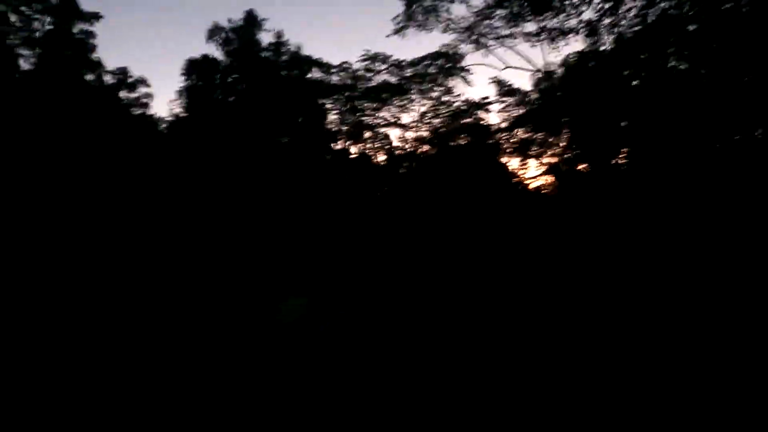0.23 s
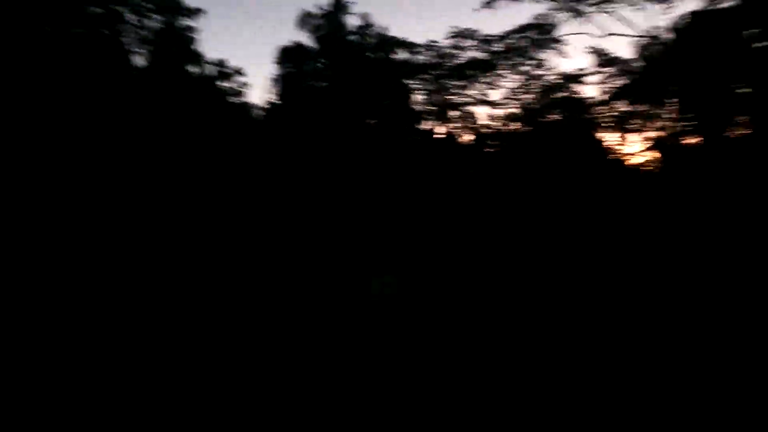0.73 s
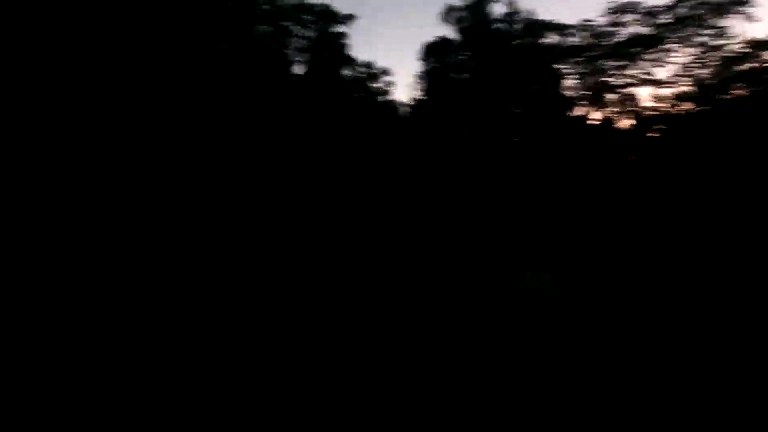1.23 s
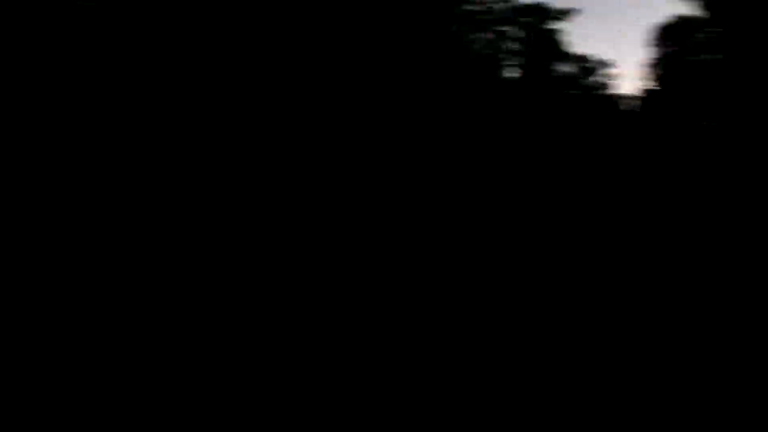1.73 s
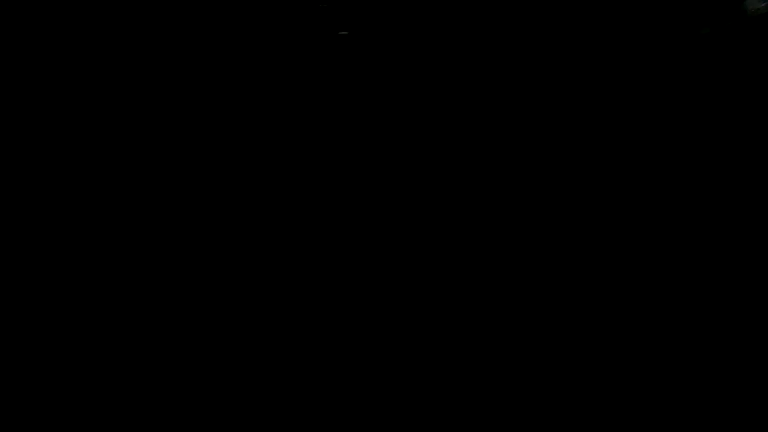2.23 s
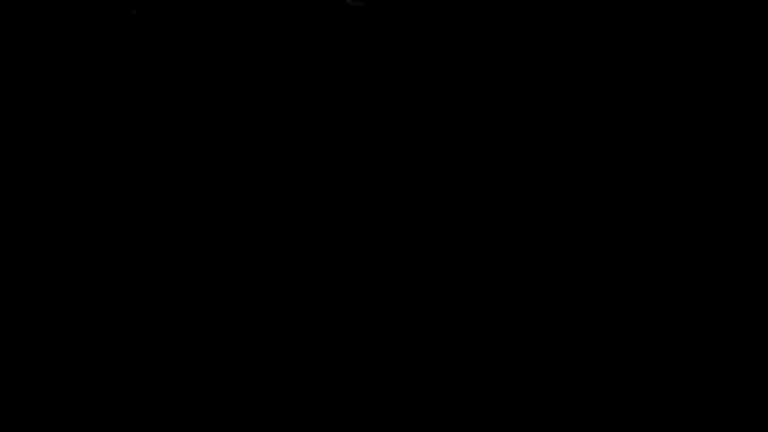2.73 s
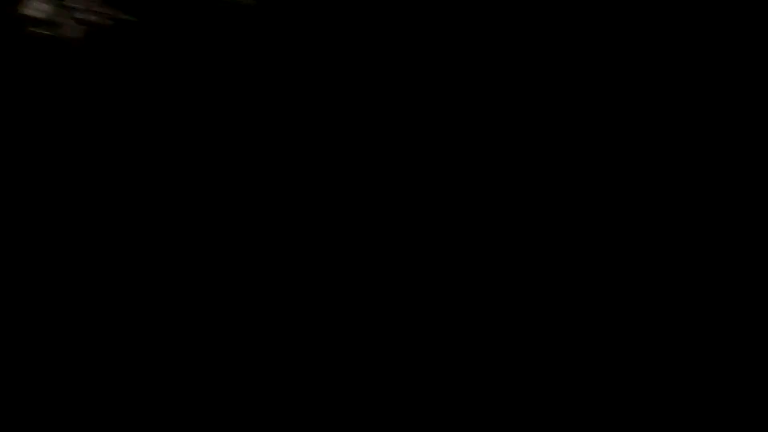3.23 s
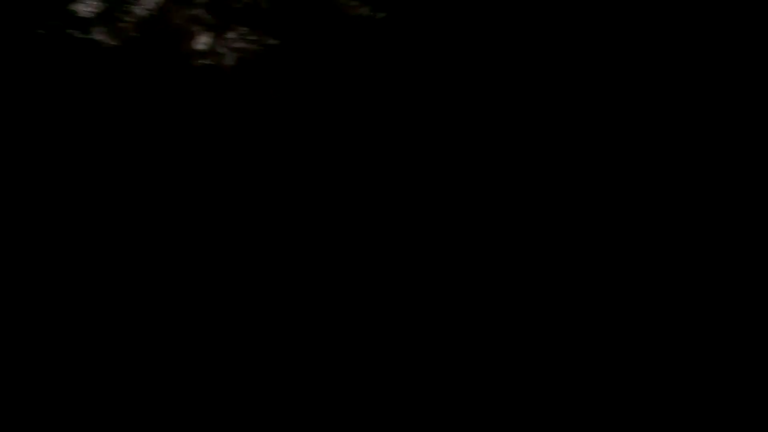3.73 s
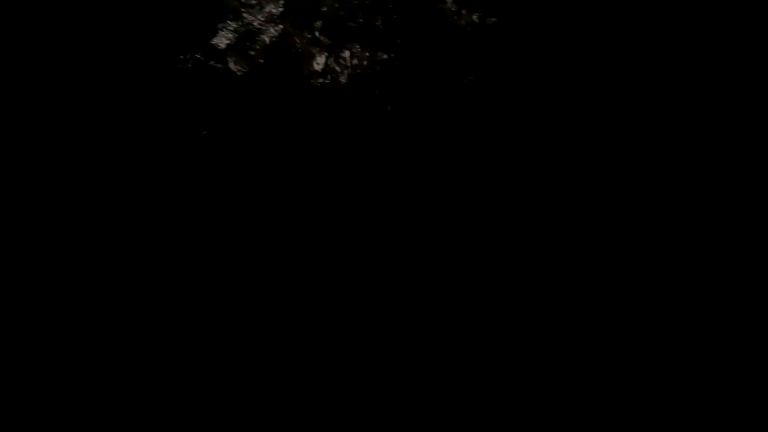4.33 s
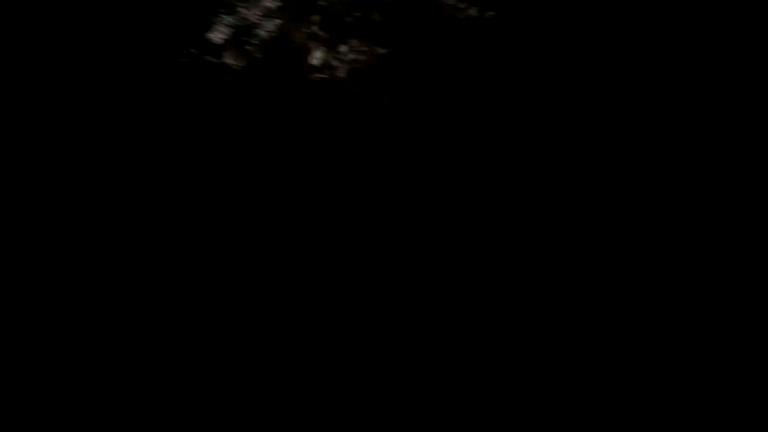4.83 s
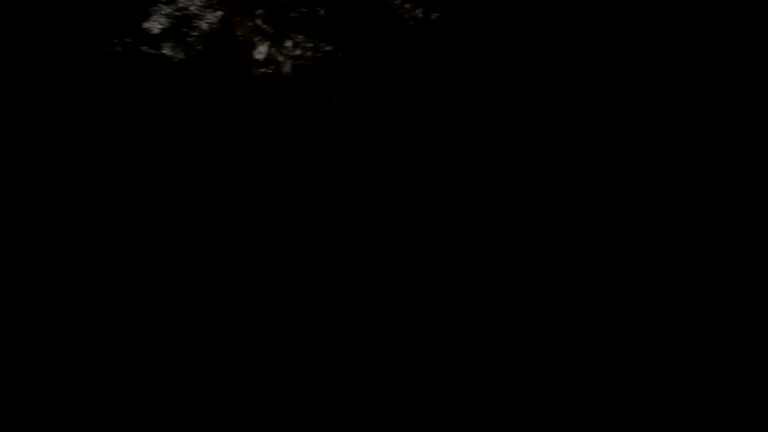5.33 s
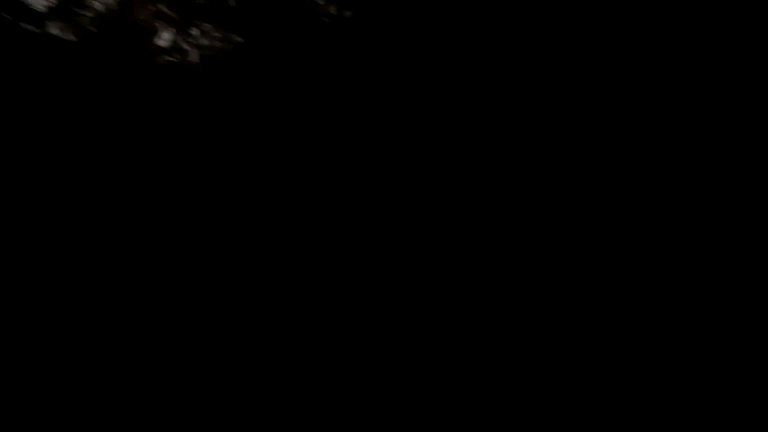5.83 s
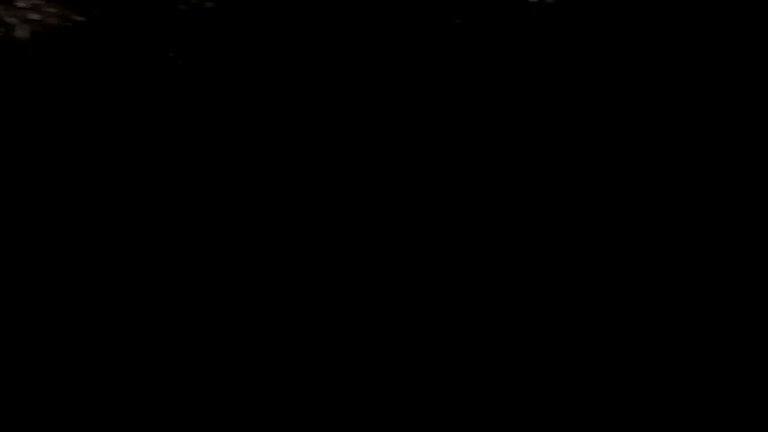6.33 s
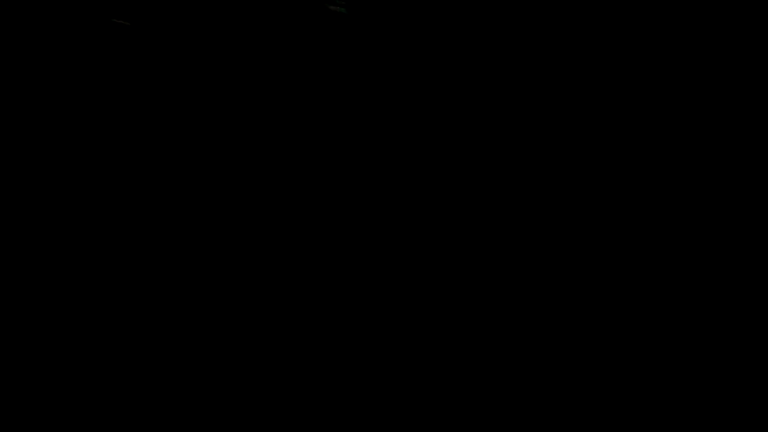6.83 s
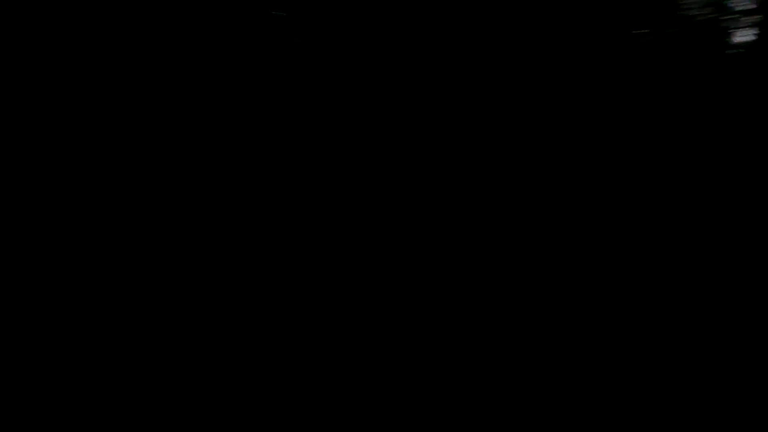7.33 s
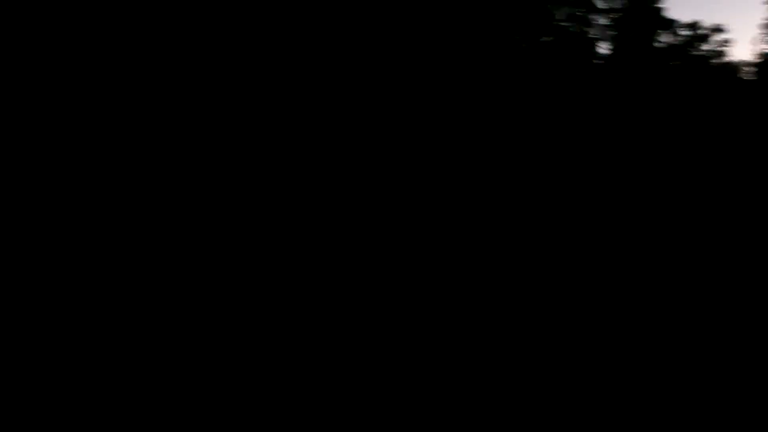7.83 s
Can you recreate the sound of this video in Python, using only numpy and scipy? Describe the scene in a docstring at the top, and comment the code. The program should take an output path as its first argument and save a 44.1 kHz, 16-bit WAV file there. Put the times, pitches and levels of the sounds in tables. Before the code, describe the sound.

Hand-held camera outdoors among trees at daybreak. Countless small birds chirp and whistle near and far, with diffuse woodland reverberation. Fingers tap, creak and scuff the plastic body very close, sharp clicks first clustering about two seconds in. A regular falling coo then joins, with two faint hoarse calls, crackling rustles and a mellow whistle rising in steps; late clicks and bumps return. The sound opens from central to wide.

```python
"""Dawn in a forest, heard by a hand-held camera: from the start many birds whistle, chirp and glide as sines with
noise-shaped echoes among the trees, over far song and a low murmur of air. The image begins central and opens by
3.6 s. Fingers click most densely from 1.9 to 3 s, with decaying rings, creaks, thumps and filtered-noise rubs.
Coos follow from 3 s, a hoarse call near 3.4 and 6.3 s, strong puffs of crackling rustle between 3.9 and 4.8 s,
and a whistle climbing in steps near 5.8 and 6.6 s; after 6.4 s the clicks gather again."""
import sys
import numpy as np
from scipy import signal
from scipy.fft import rfft, irfft, next_fast_len
from scipy.io import wavfile
from scipy.ndimage import uniform_filter1d, map_coordinates

SR = 44100
rng = np.random.default_rng(int(sys.argv[2]) if len(sys.argv) > 2 else 0)


def to_wav(sig):
    """Store sig (one row per channel, or 1-D mono) as 16-bit WAV at the path in sys.argv[1].

    Samples outside -1..1 are clipped; the rate is SR.
    """
    pcm = np.clip(np.atleast_2d(sig), -1, 1) * 32767
    pcm = np.round(pcm).astype(np.int16)
    wavfile.write(sys.argv[1], SR, pcm.T)  # frames by channels


N = 356945

# Levels in the tables are relative: layer gains and stereo balance follow.
# Steady low murmur of the air: (frequency [Hz], density [dB per Hz])
AIR_SPECTRUM = [(90, -64), (125, -7), (170, 5), (300, -10), (700, -9), (1000, -43.5)]
# Far song as a whole: (time [s], relative level [dB])
FAR_LEVEL = [(0.0, -43.5), (0.31, -45), (8.09, -44)]
# Blur of birds too far to tell apart: (frequency [Hz], density [dB per Hz])
BLUR_SPECTRUM = [(500, -35), (850, -16.5), (1150, -3), (2000, -4.5), (2600, 1.5), (3600, 5.5), (5600, -7.5),
                 (7500, -28), (10000, -88)]
# Dry leaves or cloth rustling close by: (frequency [Hz], density [dB per Hz])
RUSTLE_SPECTRUM = [(3240, -14), (5500, -39.5), (5830, -7.5), (7290, -11), (9960, -22.5), (11400, -30.5),
                   (16000, -61)]
# Its slow level: (time [s], relative level [dB])
RUSTLE_LEVEL = [(0.0, -76), (1.1, -77.5), (2.54, -66.5), (3.51, -74), (4.69, -72), (5.25, -75.5),
                (6.74, -68), (7.23, -72.5), (8.09, -56)]
# Its puffs: (time [s], relative level at the height [dB])
RUSTLE_PUFFS = [(1.33, -76), (1.52, -75), (2.45, -68), (2.95, -81), (3.96, -58), (4.18, -75), (4.27, -68),
                (4.39, -67), (4.58, -69), (4.73, -56.5), (4.97, -71), (5.18, -72), (5.47, -63.5),
                (5.57, -67), (5.77, -69), (6.13, -73), (6.28, -78), (6.68, -66), (6.9, -65), (7.26, -61.5),
                (7.46, -65), (7.89, -64)]
PUFF_RISE_S, PUFF_FALL_S = 0.027, 0.039  # time constants

# Sway of a steady hand: (frequency [Hz], density [dB per Hz])
SWAY_SPECTRUM = [(12, 1.5), (30, -9.5), (60, -7.5), (110, -44), (200, -85)]
STILL_DB = -70.5  # its relative level
# Jolts of the grip, each a low swing: (time [s], relative level at the height [dB])
GRIP_JOLTS = [(.3, -49), (.45, -50), (.96, -56), (1.79, -45), (2.05, -49), (2.5, -49), (2.72, -32.5),
              (2.9, -58), (3.3, -50.5), (3.45, -54), (3.65, -37), (3.71, -47), (3.87, -48.5), (4.05, -51),
              (4.23, -48), (4.29, -44), (4.34, -49), (4.38, -49), (4.45, -46), (4.62, -40.5), (4.68, -51),
              (5.17, -52.5), (5.84, -40.5), (6.65, -56), (7.23, -51), (7.35, -55), (7.48, -55),
              (7.71, -33.5), (7.78, -36)]
JOLT_HZ, JOLT_DRIFT = 27, .2  # pitch of the swing, its drift as a share
JOLT_RISE_S, JOLT_FALL_S = 0.012, 0.022  # time constants
# Skin on plastic: (frequency [Hz], density [dB per Hz])
RUB_SPECTRUM = [(53, -50.5), (90, -14), (259, -2), (789, -11.5), (888, -12.5), (1210, -6), (1800, -12.5),
                (3000, -13.5), (3900, -41), (6600, -120)]
# Skin creeping on the shell: (time [s], relative level [dB])
RUB_LEVEL = [(0.0, -61.5), (0.45, -57.5), (1.78, -59), (1.91, -49), (2.34, -58.5), (2.88, -81),
             (3.22, -60.5), (3.47, -56.5), (4.1, -62.5), (4.4, -46), (4.93, -63.5), (7.64, -68.5),
             (7.8, -52.5), (8.09, -47.5)]
# Short scuffs of a finger: (time [s], relative level at the height [dB])
FINGER_SCUFFS = [(.01, -52.5), (.42, -52.5), (1.42, -53), (1.76, -77), (2.1, -56), (2.46, -43.5),
                 (2.72, -52), (3.4, -57), (3.7, -57), (3.87, -52), (4.27, -47), (4.34, -56), (4.44, -70),
                 (4.73, -59), (4.65, -63), (5.42, -60), (6.65, -57), (7.26, -60), (7.75, -50), (7.92, -77)]
SCUFF_RISE_S, SCUFF_FALL_S = 0.065, 0.045  # time constants
# Gain of the rub's treble: (time [s], gain [dB])
RUB_TREBLE_GAIN = [(0, 0), (2.6, 1.5), (3.4, -5), (4.2, -14), (5.3, -12), (7.0, 0.5), (7.8, -6), (8.09, -6)]
RUB_SPLIT_HZ = 720
# Thumps of the grip: (time [s], relative level [dB], push length [s])
GRIP_THUMPS = [(2.707, -25.5, 0.0013), (3.651, -37.5, 0.0045), (4.255, -35.5, 0.0011), (4.33, -36, 0.0018),
               (4.416, -34, 0.0011), (4.47, -46, 0.00083), (7.781, -30.5, 0.0032), (5.826, -20.5, 0.00081),
               (6.619, -44, 0.0013), (7.891, -23.5, 0.00073)]
# Creaks of the shell: (time [s], length [s], slips [per s], ring [Hz], relative level [dB])
SHELL_CREAKS = [(0.01, .03, 72, 260, -25), (1.695, 0.067, 75, 347, -32), (2.423, .012, 60, 278, -24.5),
                (7.12, .012, 60, 196, -32.5), (7.238, .012, 60, 410, -30), (7.255, .012, 60, 267, -28.5)]
# Clicks of the shell: (time [s], relative level [dB], ring [Hz], relative level of the bright tick [dB])
SHELL_CLICKS = [(0.441, -24, 1320, -82), (0.6, -32, 1220, -76), (1.89, -27, 1800, -57),
                (1.918, -33, 596, -74), (1.936, -12.5, 910, -68), (1.9365, -9.5, 3370, -76),
                (2.049, -32, 1320, -58), (2.18, -30.5, 1210, -67), (2.194, -25, 1300, -64),
                (2.387, -12.5, 1480, -72), (2.446, -31.5, 566, -46), (2.463, -34, 1510, -50),
                (2.481, -33, 1920, -80), (2.514, -26, 2180, -57), (2.555, -12.5, 5070, -70),
                (2.555, -31, 1130, -39.5), (2.634, -27.5, 1030, -68), (2.733, -28.5, 1090, -56),
                (2.743, -20, 1150, -67), (2.961, -31.5, 1420, -53), (2.99, -30, 1370, -60),
                (3.345, -28, 1250, -57), (3.383, -33, 1320, -76), (3.931, -62, 1130, -42),
                (4.263, -38, 784, -45.5), (4.377, -30, 1140, -47.5), (5.824, -38, 664, -48),
                (6.277, -35, 1680, -46), (6.446, -21, 2100, -41.5), (6.664, -28, 1650, -50),
                (6.907, -37, 2130, -44.5), (7.256, -16.5, 1170, -66), (7.257, -15.5, 2330, -67),
                (7.427, -20.5, 1340, -39.5), (7.465, -26, 1360, -49), (7.475, -31.5, 1380, -74),
                (7.669, -23, 2200, -71), (7.718, -29.5, 1780, -71), (7.762, -24, 1400, -62),
                (7.847, -26.5, 1440, -43), (7.888, -35, 680, -56)]
# The shell's high modes: (frequency [Hz], width [Hz], gain [dB])
SHELL_MODES = [(5100, 280, 7), (7100, 2700, 20), (11100, 6500, -32)]

# Echoes among the trees: (frequency [Hz], time to fall 60 dB [s])
TREE_T60 = [(800, 1.0), (2200, 1.3), (4000, 1.0), (7000, .7)]
STIR_S, STIR_PER_S = .00022, 26  # moving leaves shift the echoes in time; knots of that shift a second
LEAVES_DB, LEAVES_T60_S = 4, 0.19  # scatter off the nearest branches against direct sound
SCATTER_HZ, ECHO_TILT_DB = 3200, 4  # leaves scatter little below this pitch; dB more echo an octave up
NEAR_DB, DRIER = -58.5, 0.13  # a bird louder than this is nearer: dB less echo for each dB of level
# Echo against direct sound before distance and pitch: (kind of note: gain [dB])
KIND_ECHO_DB = {"glide": 0, "plunge": -9, "chip": -5, "held": -2, "coo": -1.5, "crow": 2, "climb": 3.5}

# Flutter of a note at FLUTTER_HZ, growing with the square of its pitch: level [dB], phase [rad]
FLUTTER_DB, FLUTTER_RAD, FLUTTER_HZ = 2.5, 1, 4110
WARBLE, WARBLE_PER_S = .012, 35  # pitch drift as a share at FLUTTER_HZ; knots a second
# Attack and release as shares of a note; longest attack (a release may take twice that)
ATTACK, RELEASE, EDGE_S = .25, .25, .016

# Slurred whistles, rising or falling: (time [s], length [s], start [Hz], end [Hz], relative level [dB])
GLIDE_NOTES = [(6.948, 0.039, 3320, 2050, -58), (7.679, 0.036, 5250, 3900, -40.5),
               (6.411, 0.019, 6170, 4950, -53), (6.553, 0.031, 2960, 2180, -46.5),
               (0.187, 0.043, 5810, 4660, -51), (0.705, 0.083, 3750, 2540, -51),
               (7.146, 0.023, 2080, 3130, -48.5), (0.317, 0.067, 3590, 3920, -44.5),
               (0.377, 0.025, 4190, 4500, -44), (0.4, 0.034, 4560, 4330, -42.5),
               (.44, 0.043, 4370, 4510, -59), (0.415, 0.048, 3700, 3540, -46),
               (0.62, 0.1, 5060, 3840, -43.5), (0.882, 0.057, 3040, 3265, -44),
               (0.951, 0.1, 6130, 4700, -51.5), (0.984, 0.13, 3980, 4116, -42.5),
               (1.202, 0.046, 4200, 4840, -42.5), (1.3, 0.047, 3180, 2880, -45.5),
               (0.984, 0.029, 3110, 2770, -44.5), (1.12, 0.033, 4130, 3630, -39),
               (1.343, 0.098, 2900, 4276, -44), (1.603, 0.04, 6260, 4700, -50.5),
               (1.625, 0.067, 4670, 3980, -42), (1.864, 0.019, 6450, 3706, -45),
               (2.128, 0.086, 4040, 3590, -47), (2.38, 0.076, 4220, 3640, -51.5),
               (2.479, 0.046, 4650, 3500, -50), (2.893, 0.054, 3540, 4185, -43),
               (3.087, 0.039, 6460, 5400, -52), (3.252, 0.089, 4420, 4710, -55),
               (3.935, 0.07, 4240, 3224, -47), (3.833, 0.039, 2886, 2300, -49.5),
               (4.01, 0.045, 2690, 2395, -46.5), (4.309, 0.074, 3304, 4190, -43),
               (4.621, 0.058, 2383, 2584, -48), (7.367, 0.017, 2460, 3210, -47),
               (7.384, 0.02, 3210, 2450, -46.5), (7.17, 0.024, 3100, 2144, -49),
               (7.668, 0.02, 4430, 5350, -41), (7.915, 0.032, 4280, 5160, -42.5),
               (4.492, 0.029, 4860, 3400, -44.5), (5.664, 0.045, 4060, 3400, -49.5),
               (5.732, 0.04, 2516, 1470, -49.5), (5.888, 0.095, 2870, 3390, -51),
               (6.29, 0.14, 5320, 3210, -44), (6.429, 0.16, 3125, 4610, -50),
               (6.638, 0.054, 4820, 3880, -44.5), (6.716, 0.028, 4050, 3176, -40.5),
               (6.835, 0.077, 4780, 3155, -45), (6.865, 0.058, 5740, 4480, -45.5),
               (6.912, 0.065, 4500, 3700, -45), (6.964, 0.1, 3570, 4120, -44.5),
               (6.995, 0.025, 4370, 5950, -56), (7.199, 0.029, 2500, 3570, -42.5),
               (7.202, .025, 2540, 2520, -48), (7.422, 0.027, 2636, 2400, -53),
               (4.163, 0.041, 2700, 3380, -53), (7.207, 0.0263, 4950, 4250, -40),
               (7.234, 0.054, 4200, 4015, -39), (7.303, 0.057, 4090, 3530, -41.5),
               (7.459, 0.062, 4085, 3715, -41), (7.632, 0.028, 6400, 4220, -46),
               (7.655, 0.15, 3570, 2600, -53.5), (7.709, 0.065, 3830, 3794, -37),
               (7.753, 0.075, 3816, 4133, -40.5), (7.759, 0.037, 5380, 6130, -46),
               (7.944, 0.031, 5000, 3820, -41.5), (3.501, 0.056, 3000, 3557, -48.5),
               (3.534, .04, 3600, 3200, -57), (3.781, 0.04, 2754, 1860, -59),
               (4.221, 0.041, 3400, 2290, -47), (6.48, 0.016, 6020, 5250, -50),
               (0.931, 0.032, 2930, 2000, -48.5), (1.01, .04, 2724, 2060, -56),
               (7.902, .03, 3485, 2530, -53), (7.79, 0.027, 2800, 2050, -55),
               (7.985, .025, 3340, 2590, -47)]
HOOK = .68  # share of the slur done half-way through
# One bird plunging to the same low pitch: (time [s], top [Hz], relative level [dB])
PLUNGE_NOTES = [(.477, 3570, -51.5), (1.711, 3860, -46.5), (3.3, 4010, -48), (4.737, 3950, -43)]
PLUNGE_HZ_PER_S, PLUNGE_END_HZ = 22000, 2180
# Chips that flick up and down again: (time [s], top [Hz], flick [share of pitch], relative level [dB])
CHIP_NOTES = [(.001, 3350, 0.032, -48.5), (1.4, 4710, 0.062, -55), (1.497, 4200, 0.077, -50.5),
              (2.053, 3510, 0.09, -44.5), (2.764, 3460, 0.049, -47.5), (3.379, 5470, .06, -54),
              (4.188, 3460, 0.15, -40), (4.955, 3460, 0.109, -40.5), (7.375, 4920, 0.11, -47.5)]
CHIP_S = 0.0655
# Level whistles that sag a little: (time [s], length [s], pitch [Hz], relative level [dB])
HELD_NOTES = [(0.363, 0.011, 2560, -43.5), (0.875, 0.081, 4040, -45), (0.943, 0.03, 3700, -41.5),
              (4.717, 0.026, 4100, -43), (4.219, 0.11, 3960, -56), (4.511, 0.025, 3430, -43.5),
              (5.039, 0.022, 3427, -59), (7.81, 0.025, 3630, -43), (7.463, 0.034, 3990, -47),
              (6.897, 0.037, 3035, -44.5), (1.439, 0.1, 3733, -45.5), (1.691, 0.077, 3840, -42),
              (2.227, 0.055, 3930, -53), (3.289, 0.024, 4120, -44), (3.809, 0.03, 2930, -46.5),
              (4.04, 0.048, 3470, -49), (2.405, 0.043, 2513, -50), (2.592, 0.046, 2440, -54),
              (2.668, 0.1, 4000, -50.5), (3.105, 0.16, 5800, -62), (3.199, 0.021, 2580, -50),
              (3.414, 0.026, 2365, -49), (3.949, 0.12, 3570, -60), (4.426, 0.12, 4800, -51.5),
              (4.552, 0.093, 4840, -56), (4.85, 0.028, 2420, -51.5), (5.195, 0.3, 4815, -56),
              (5.689, 0.023, 2577, -41.5), (5.862, 0.091, 5700, -60), (6.007, 0.061, 3393, -46.5),
              (6.112, 0.018, 3190, -43), (6.118, 0.12, 4650, -56), (6.133, 0.049, 4040, -46.5),
              (6.19, 0.039, 2980, -45.5), (6.356, 0.077, 2510, -48), (6.455, 0.043, 4610, -44),
              (7.013, 0.056, 5800, -52), (7.02, 0.046, 3093, -42.5), (7.299, 0.22, 4190, -56),
              (7.955, 0.052, 4000, -46), (3.008, 0.081, 2560, -54.5), (3.53, 0.23, 4440, -82),
              (3.795, 0.082, 4680, -62), (4.797, 0.17, 4600, -73), (8.036, 0.019, 2750, -48)]
SAG = 0.0143  # share of the pitch above at the start and below at the end
# A low falling coo, a little over twice a second: (time [s], relative level [dB])
COO_NOTES = [(2.99, -53), (3.445, -51), (3.877, -51), (4.328, -51), (4.782, -52), (5.228, -52),
             (5.705, -52), (6.195, -52), (6.66, -54), (7.13, -57)]
# Its pitches: (start [Hz], middle [Hz], end [Hz])
COO_PITCHES = (1285, 1165, 1010)
COO_S = .095
# A far hoarse call: (time [s], length [s], pitch [Hz], relative level [dB])
CROW_CALLS = [(3.413, 0.29, 728, -57), (6.294, 0.293, 738, -54.5)]
# Its overtones, with a rough sideband under the top one: (multiple of the pitch, gain [dB])
CROW_OVERTONES = [(1, -14.5), (2.001, -1), (2.83, -3), (3, 2.5)]
# A mellow whistle climbing in steps, two calls: (time [s], pitch [Hz], relative level [dB])
CLIMBING_CALLS = [
    [(5.84, 1220, -61), (5.97, 1450, -61), (6.02, 1520, -55.5), (6.055, 1680, -51), (6.12, 1720, -54),
     (6.165, 1880, -47), (6.195, 2040, -52), (6.25, 2050, -47.5), (6.275, 1900, -49)],
    [(6.6, 1580, -43), (6.63, 1690, -53), (6.68, 1720, -52.5), (6.715, 2030, -48), (6.745, 2060, -47),
     (6.77, 1800, -59), (6.79, 1855, -50), (6.81, 2130, -56), (7.0, 2135, -65), (7.05, 2040, -58)],
]
# A low whistle that arches up and sags: (time [s], pitch [Hz], relative level [dB])
ARCHING_CALL = [(.15, 1160, -67), (.19, 1300, -53.5), (.31, 1323, -56), (.4, 1203, -72)]

# The camera turns past the birds: (time [s], left over right [dB])
CAMERA_TURN = [(0, 2.5), (2.2, 2), (4.5, 1), (6.5, -0.4), (8.09, -0.3)]
# Opening of the stereo image: (time [s], side gain [dB])
STEREO_WIDTH = [(0, -58), (.7, -80), (.9, -28), (1.4, -10.5), (2.2, -6.5), (3.6, 0.5)]
TOP_HZ = 15700  # the camera's band limit


def amp(db):
    """dB to gain."""
    return 10 ** (np.asarray(db) / 20)


def unit(x):
    """x at rms 1."""
    return x / np.sqrt(np.mean(x ** 2) + 1e-20)


def along(points, hz):
    """Values of (Hz, value) points, interpolated on a log axis."""
    f, v = np.transpose(points)
    return np.interp(np.log(hz + 1), np.log(f + 1), v)


def curve(rows):
    """One value per sample from (s, value) rows."""
    s, values = np.transpose(rows)
    return np.interp(np.arange(N) / SR, s, values)


def swells(rows, rise, fall):
    """A gain curve: each (s, dB) row grows up to its moment and dies away after it."""
    t = np.arange(N) / SR
    return sum(amp(db) * np.exp(np.minimum((t - s) / rise, (s - t) / fall)) for s, db in rows)


def wobble(rate):
    """A smooth random curve, rate knots a second."""
    knots = rng.standard_normal(int(N * rate / SR) + 4)
    return map_coordinates(knots, [np.arange(N) * rate / SR])


def filtered(x, response):
    """x through a filter given as a complex response of frequency."""
    m = next_fast_len(N + SR // 2)
    return irfft(rfft(x, m) * response(np.fft.rfftfreq(m, 1 / SR)), m)[..., :N]


def sides(pan_db):
    """Left and right gains for a left-over-right balance in dB."""
    return amp(np.array([pan_db / 2, -pan_db / 2]))


def left_right(mid, side):
    """Left and right from middle and side."""
    return np.array([mid + side, mid - side])


def add(track, s, sound):
    """Lays a sound into the track at s seconds."""
    part = track[..., round(s * SR):][..., :sound.shape[-1]]
    part += sound[..., :part.shape[-1]]


def crackle(rate, spread_db):
    """Sparse one-sample grains of very uneven size, rate a second, two unrelated sets."""
    struck = rng.random((2, N)) < rate / SR
    return struck * amp(spread_db * rng.standard_normal((2, N))) * rng.standard_normal((2, N))


def rush(spectrum, side_db, patchy_db, grains=0):
    """Stereo noise of rms 1 with grains added, in patches of random gain over time and frequency."""
    z = signal.stft(rng.standard_normal((2, N)) + grains, nperseg=512)[2]
    field = rng.standard_normal(z.shape[1:])
    field = uniform_filter1d(uniform_filter1d(field, 5, 0), 12, 1)
    pair = signal.istft(z * amp(patchy_db * unit(field)), nperseg=512)[1][:, :N]
    mid, side = filtered(pair, lambda hz: amp(along(spectrum, hz)))
    return unit(left_right(mid, amp(side_db) * side))


def trees(x):
    """Echoes off trunks and leaves: they build up after the direct sound, each frequency dying at its own speed."""
    hz, t, z = signal.stft(rng.standard_normal((2, SR)), SR, nperseg=256)
    decay = amp(-60 * t / along(TREE_T60, hz)[:, None])
    build_up = 1 - np.exp(-t / .03)
    mid, side = signal.istft(z * decay * build_up, SR, nperseg=256)[1]
    echoes = left_right(mid, amp(-5) * side) / np.linalg.norm(mid)
    stirred = map_coordinates(x, [np.arange(N) + STIR_S * SR * wobble(STIR_PER_S)])
    return signal.fftconvolve(stirred[None], echoes, axes=1)[:, :N]


def leaves(x):
    """The nearest branches scatter a note into a short smear, high notes the most."""
    t = np.arange(SR // 6) / SR
    common, separate = rng.standard_normal(len(t)), rng.standard_normal((2, len(t)))
    smear = (common + .5 * separate) * amp(-60 * t / LEAVES_T60_S)
    scattered = signal.fftconvolve(x, smear / np.linalg.norm(smear[0]), axes=1)[:, :N]
    return x + amp(LEAVES_DB) * filtered(scattered, lambda hz: hz ** 2 / (hz ** 2 + SCATTER_HZ ** 2))


def whistle(hz):
    """A sine on a pitch track; leaves and eddies on its way make it flutter."""
    t = np.arange(len(hz)) / SR
    rates, knot_sets = (190, 190, WARBLE_PER_S), rng.standard_normal((3, 100))
    level, lag, drift = (np.interp(t * rate, np.arange(100), knots) for rate, knots in zip(rates, knot_sets))
    rough = (hz.mean() / FLUTTER_HZ) ** 2
    attack = t / min(ATTACK * t[-1], EDGE_S)
    release = t[::-1] / min(RELEASE * t[-1], 2 * EDGE_S)
    swell = np.clip(np.minimum(attack, release), 0, 1)
    turns = np.cumsum(hz * (1 + WARBLE * rough * drift)) / SR
    flutter = unit(amp(FLUTTER_DB * rough * level))
    return swell * flutter * np.sin(2 * np.pi * turns + FLUTTER_RAD * rough * lag)


def note(length, start_hz, mid_hz, end_hz):
    """A whistle gliding on a parabola through three pitches."""
    u = np.arange(round(length * SR)) / (length * SR)
    return whistle(start_hz * 2 * (u - .5) * (u - 1) - mid_hz * 4 * u * (u - 1) + end_hz * 2 * u * (u - .5))


def air():
    """The steady low murmur of the air, as shaped noise."""
    return amp(-67.0) * rush(AIR_SPECTRUM, side_db=-11.5, patchy_db=3.5)


def far_song(count=600):
    """Many small chirps from further off, mostly echo, over a noise blur of birds too far to tell apart."""
    chirps, level_db = np.zeros(N), curve(FAR_LEVEL)
    for s, length, pitch, bend, fall, size in rng.random((count, 6)):
        hz = 2400 * 2.2 ** pitch
        song = note(0.02535 + 0.07 * length, hz * (0.8 + 0.55 * fall), hz * (1 + .3 * bend), hz)
        add(chirps, s * N / SR, amp(6.5 * size - 0.007 * abs(hz - 3700)) * song)
    chorus = unit(amp(-6.0) * chirps + trees(chirps))
    blur = rush(BLUR_SPECTRUM, side_db=-5.5, patchy_db=4)
    return amp(level_db - 10) * chorus + amp(level_db - 7) * blur


def rustle():
    """A fine dry crackle of noise and grains in puffs, to the left."""
    grain = rush(RUSTLE_SPECTRUM, side_db=-2, patchy_db=2, grains=5 * crackle(300, 4))
    level = amp(curve(RUSTLE_LEVEL)) + swells(RUSTLE_PUFFS, PUFF_RISE_S, PUFF_FALL_S)
    return level * amp(3 + 1.5 * wobble(10)) * grain * sides(5.)[:, None]


def sway():
    """The grip sways as low noise and jolts in slow swings of drifting pitch, nearer the right port."""
    swing_hz = JOLT_HZ * (1 + JOLT_DRIFT * wobble(15))
    swing = np.sqrt(2) * np.sin(2 * np.pi * np.cumsum(swing_hz) / SR)
    jolts = swells(GRIP_JOLTS, JOLT_RISE_S, JOLT_FALL_S) * swing
    still = unit(amp(3 * wobble(14)) * rush(SWAY_SPECTRUM, side_db=-20, patchy_db=1))
    return (jolts + amp(STILL_DB) * still) * sides(-6.5)[:, None]


def rub():
    """Skin rubs the shell in small slips: uneven noise and grains, nearer the right port."""
    slips = rush(RUB_SPECTRUM, side_db=-3, patchy_db=2.5, grains=4 * crackle(400, 2.5))
    level = amp(curve(RUB_LEVEL)) + swells(FINGER_SCUFFS, SCUFF_RISE_S, SCUFF_FALL_S)
    skin = level * unit(amp(3.5 * wobble(45)) * slips)
    treble = filtered(skin, lambda hz: hz ** 4 / (hz ** 4 + RUB_SPLIT_HZ ** 4))
    skin = skin + (amp(curve(RUB_TREBLE_GAIN)) - 1) * treble
    return skin * sides(-4.5)[:, None]


def thumps():
    """The grip thumps: a quick suck of pressure, its rebound and a low swing, nearer the right port."""
    out, t = np.zeros(N), np.arange(SR // 8) / SR
    swing = 0.096 * np.sin(2 * np.pi * 28 * t) * amp(-60 * t / 0.13)
    for s, db, push in GRIP_THUMPS:
        dip = -(t / push) * (2 - t / push) * np.exp(-t / push)
        add(out, s, amp(db + 6.5) * (dip + swing))
    return out * sides(-6.5)[:, None]


def creaks():
    """Skin sticks and slips; every slip rings a panel and nearly its octave for a few cycles."""
    out, t = np.zeros(N), np.arange(SR // 30) / SR
    envelope = amp(-60 * t / 0.024) * (1 - np.exp(-t / 0.003))
    for s, length, rate, hz, db in SHELL_CREAKS:
        ring = (np.sin(2 * np.pi * hz * t) + 0.26 * np.sin(3.9 * np.pi * hz * t)) * envelope
        for slip in np.arange(0, length, 1 / rate):
            add(out, s + slip + rng.uniform(0, 0.0019), amp(db + rng.normal(0, 4.9)) * ring)
    return out


def shell(f):
    """Response of the shell: resonances of alternating sign, dulled above 9800 Hz."""
    modes = sum((-1) ** k * amp(db) * 1j * f * width / (centre * centre - f * f + 1j * f * width)
                for k, (centre, width, db) in enumerate(SHELL_MODES))
    return modes / (1 + (f / 9800.) ** 6)


def clicks():
    """The shell rings for a few cycles and noise bursts tick in its high modes, nearer the left port."""
    rings, blows, t = np.zeros(N), np.zeros(N), np.arange(SR // 40) / SR
    for s, db, hz, tick_db in SHELL_CLICKS:
        envelope = amp(-60 * t * hz / 7) * (1 - np.exp(-t / 0.00037))  # falls 60 dB in 7 cycles
        add(rings, s, amp(db + 0.5) * -np.sin(2 * np.pi * hz * t) * envelope)
        blow = rng.standard_normal(120) * amp(np.linspace(-2, -30, 120))
        add(blows, s + 0.000052, amp(tick_db - 6.0) * blow)
    return rings * sides(4.)[:, None] + filtered(blows, shell) * sides(7.)[:, None]


def long_calls():
    """The climbing and arching whistles follow their own pitch and level curves."""
    near, path = np.zeros((2, N)), np.zeros(N)
    calls = [(rows, KIND_ECHO_DB["climb"]) for rows in CLIMBING_CALLS] + [(ARCHING_CALL, KIND_ECHO_DB["coo"])]
    for rows, echo_db in calls:
        s, hz, db = np.transpose(rows)
        t = np.arange(s[0], s[-1], 1 / SR)
        pitch, level = (uniform_filter1d(np.interp(t, s, c), size=600, mode="nearest") for c in (hz, db))
        add(near, s[0], amp(level) * whistle(pitch))
        add(path, s[0], amp(level + echo_db) * whistle(pitch))
    return leaves(near) + trees(path)


def songs():
    """Every short note as (s, length, start, middle, end Hz, relative level dB, echo dB), in order of time."""
    echo, low = KIND_ECHO_DB, PLUNGE_END_HZ
    out = [(s, n, a, a + HOOK * (b - a), b, db, echo["glide"]) for s, n, a, b, db in GLIDE_NOTES]
    out += [(s, (a - low) / PLUNGE_HZ_PER_S, a, (a + low) / 2, low, db, echo["plunge"])
            for s, a, db in PLUNGE_NOTES]
    out += [(s, CHIP_S, a * (1 - w), a, a * (1 - w), db, echo["chip"]) for s, a, w, db in CHIP_NOTES]
    out += [(s, n, a * (1 + SAG), a, a * (1 - SAG), db, echo["held"]) for s, n, a, db in HELD_NOTES]
    out += [(s, COO_S, *COO_PITCHES, db, echo["coo"]) for s, db in COO_NOTES]
    out += [(s, n, k * a * 1.02, k * a * .98, k * a * 1.1, db + part_db, echo["crow"])
            for s, n, a, db in CROW_CALLS for k, part_db in CROW_OVERTONES]
    return sorted(out)


def birds():
    """Each note gets a random left-right balance, quieter ones more echo; successive notes take different paths."""
    near, paths = np.zeros((3, 2, N)), np.zeros((3, N))
    for k, (s, length, start_hz, mid_hz, end_hz, db, echo_db) in enumerate(songs()):
        song = amp(db) * note(length, start_hz, mid_hz, end_hz)
        balance = sides(rng.normal(0, 3))[:, None]
        distance_db = -DRIER * (db - NEAR_DB)
        tilt_db = ECHO_TILT_DB * np.log2(mid_hz / SCATTER_HZ)
        add(near[k % 3], s, song * balance)
        add(paths[k % 3], s, amp(echo_db + distance_db + tilt_db) * song)
    return sum(amp(-1.5) * leaves(direct) + trees(path) for direct, path in zip(near, paths))


def scene():
    """Air, forest, the rustle close by and the hand on the camera; the turn moves the forest only."""
    forest = (far_song() + long_calls() + birds()) * sides(curve(CAMERA_TURN))
    camera = sway() + rub() + thumps() + creaks() + clicks()
    return air() + rustle() + camera + forest


def record(dry):
    """The width opens, the treble being wide from the start; nothing passes above the band limit."""
    mid, side = dry.mean(0), (dry[0] - dry[1]) / 2
    treble = filtered(side, lambda hz: hz ** 8 / (hz ** 8 + 9900.0 ** 8))
    side = treble + (side - treble) * amp(curve(STEREO_WIDTH))
    return filtered(left_right(mid, side), lambda hz: hz < TOP_HZ)


dry = scene()
out = record(dry)
to_wav(out)
```